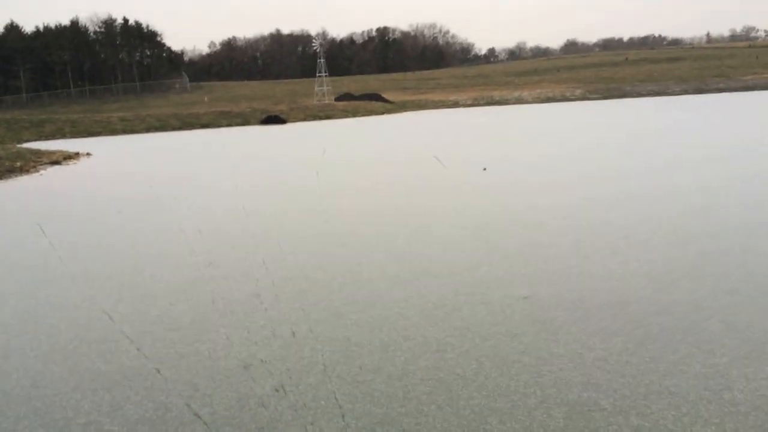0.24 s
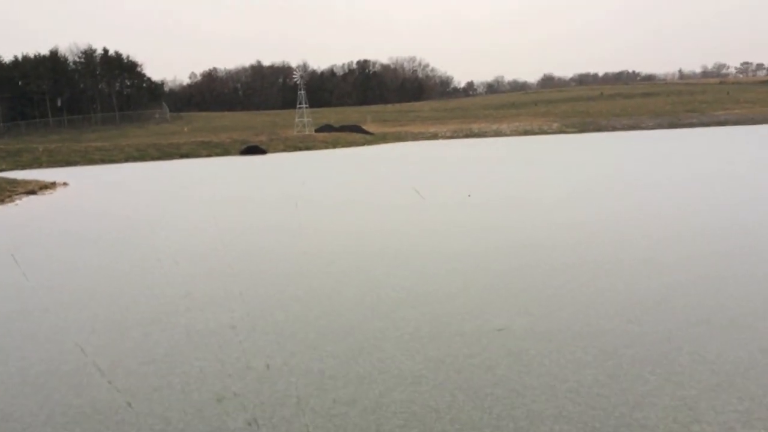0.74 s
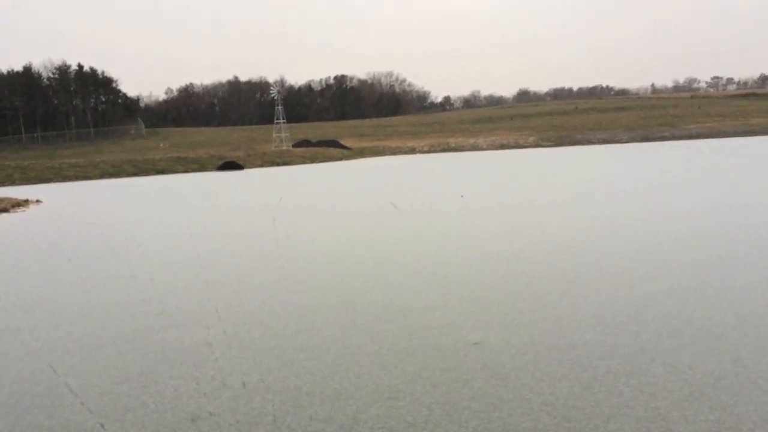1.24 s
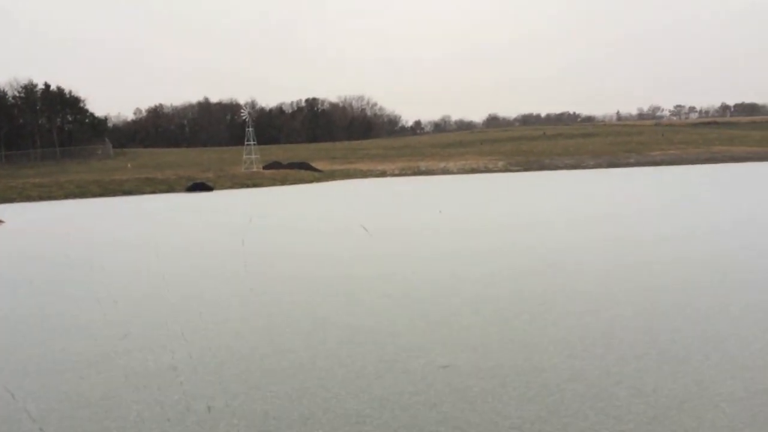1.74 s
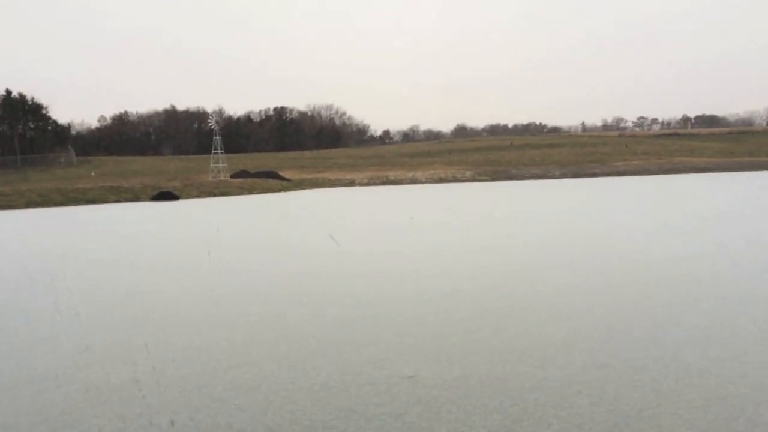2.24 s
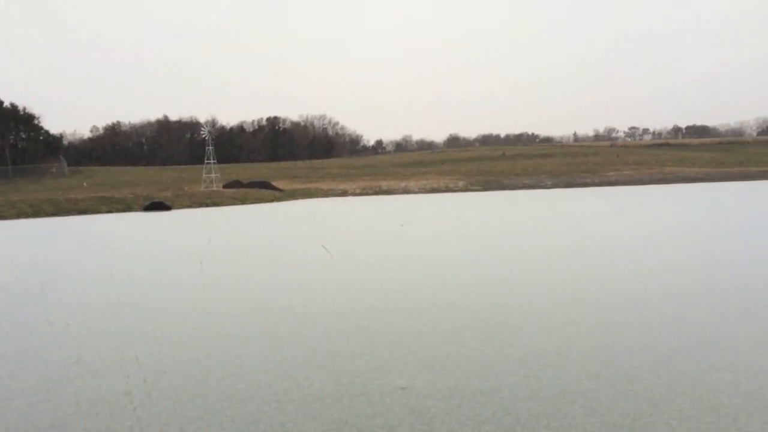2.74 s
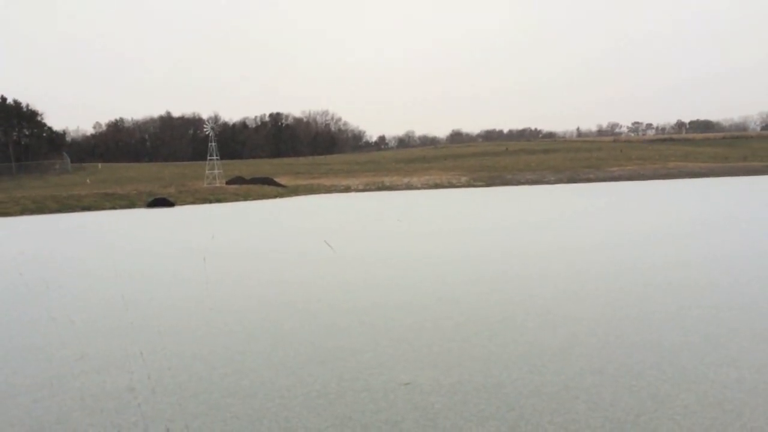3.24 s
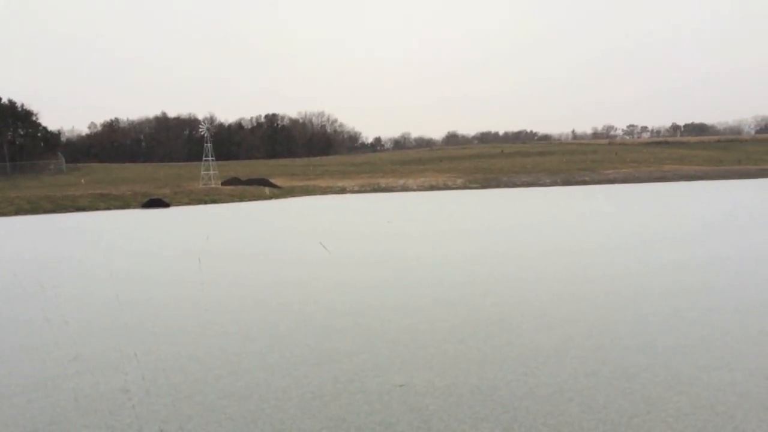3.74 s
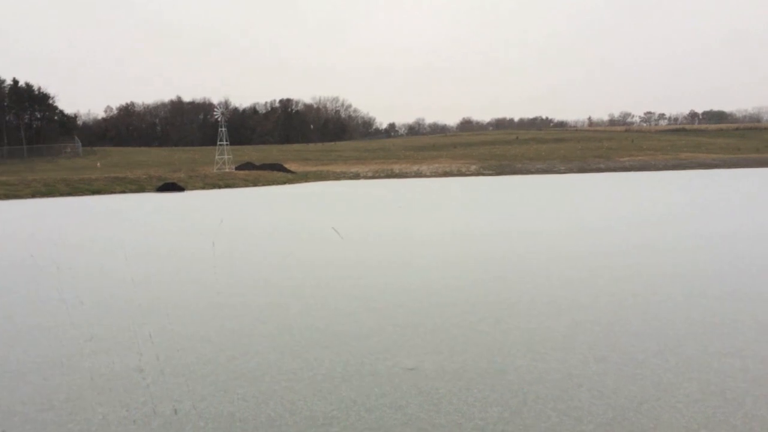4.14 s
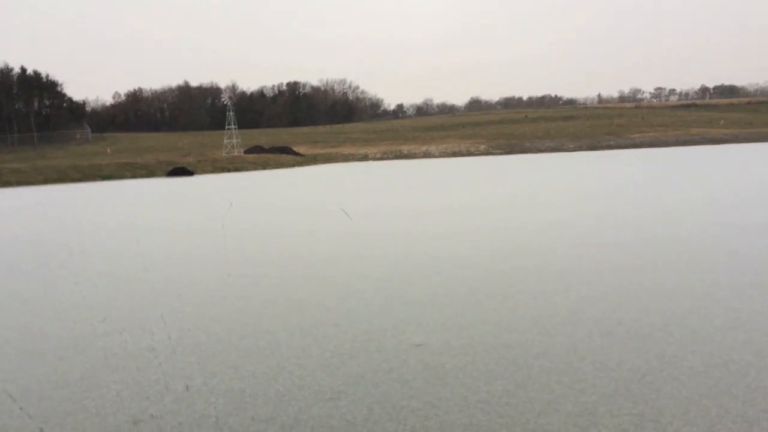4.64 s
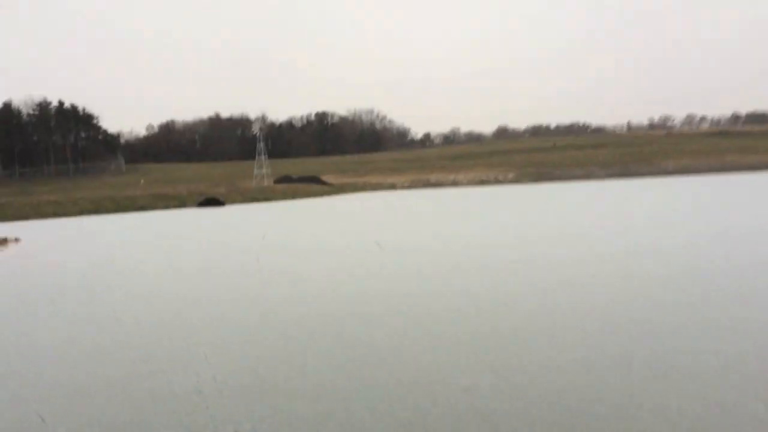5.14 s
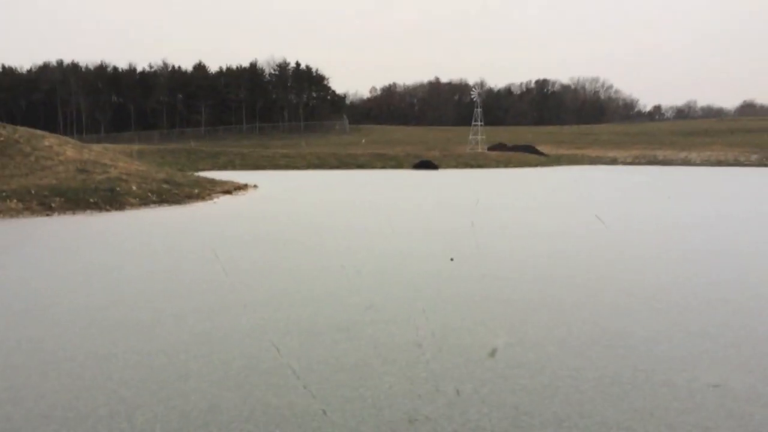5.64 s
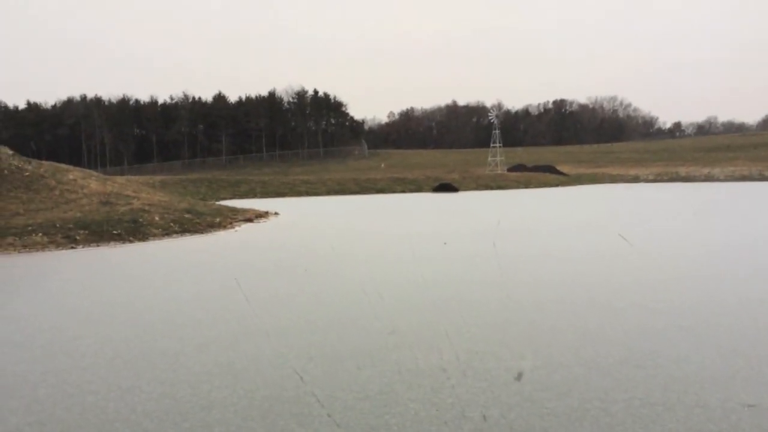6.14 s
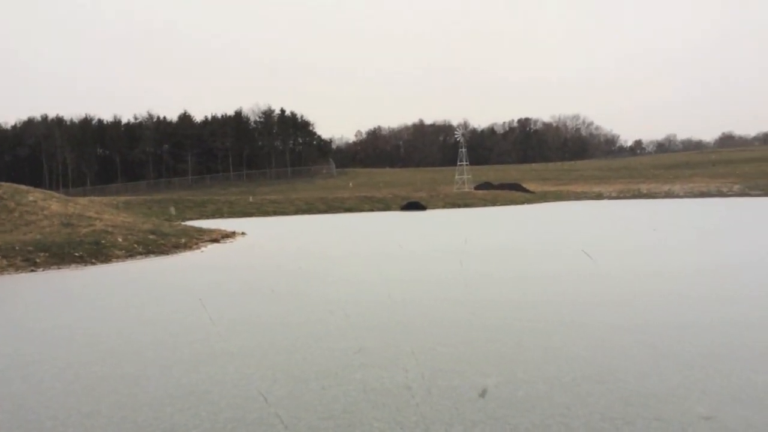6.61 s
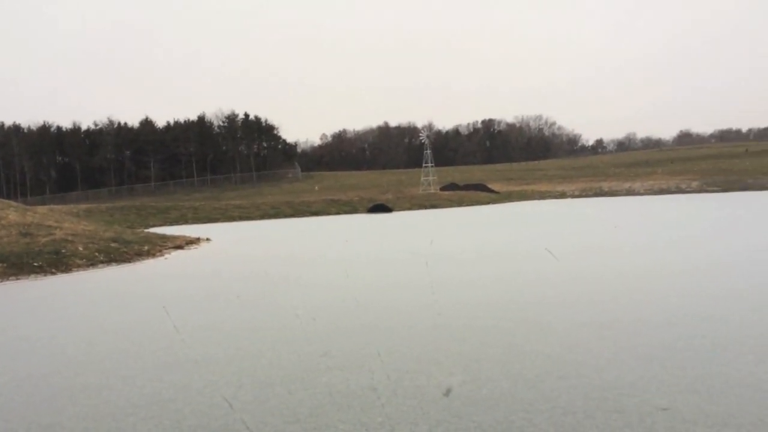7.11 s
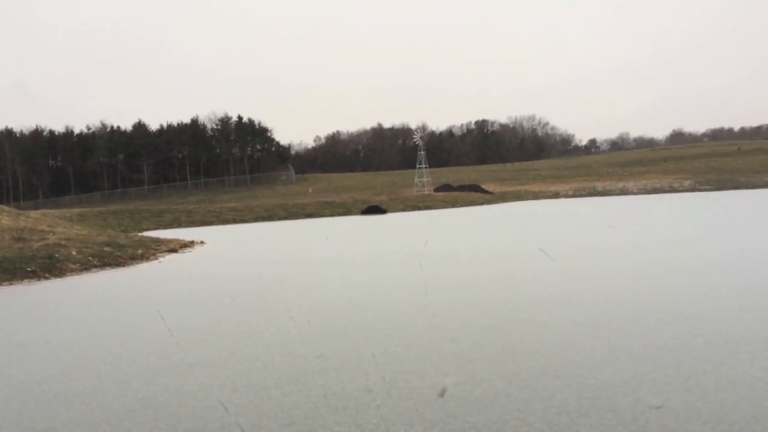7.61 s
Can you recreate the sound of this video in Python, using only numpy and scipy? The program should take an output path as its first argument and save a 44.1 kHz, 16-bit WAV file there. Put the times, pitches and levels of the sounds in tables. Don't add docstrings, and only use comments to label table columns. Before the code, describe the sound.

Two throws onto a frozen pond: bright laser-like chirps drop to a held ringing tone, fading with distance over faint breeze and echoing banks.

```python
import sys
import numpy as np
from scipy import signal
from scipy.fft import rfft, irfft, next_fast_len
from scipy.io import wavfile
from scipy.ndimage import uniform_filter1d, map_coordinates

SR = 44100
rng = np.random.default_rng(int(sys.argv[2]) if len(sys.argv) > 2 else 0)


def transcribe(signal):
    frames = np.atleast_2d(signal).T
    limited = np.clip(frames, -1, 1)
    pcm = np.round(limited * 32767).astype(np.int16)
    wavfile.write(sys.argv[1], SR, pcm)


def boost_factor(decibels):
    exponent = np.asarray(decibels, float) / 20
    return 10 ** exponent


N = 347067
SOUND_SPEED = 343
TOP_HZ = 15450
LEAD = SR // 4


def stones():
    # click arrival [s], chirp level [dB],
    # held tone re chirp [dB], chirp top re chirp [dB], click re chirp [dB]
    earlier = [
        (.02, -44.5, 4.4, 13.6, -6),
    ]
    # [s, dB, dB, dB, dB]
    first = [(0.5934, -26.5, 0, -25, -5), (0.8199, -17.5, -2, -9, -17), (1.1522, -29, -4, -15.5, -16.5),
             (1.342, -36, -3, -21, -11), (1.3592, -37.5, -7, -19.5, -5), (1.7125, -30, -4, -24.5, -17.5),
             (2.0007, -38.5, 1, -20, -20), (2.0089, -35, 2, -16, -28), (2.016, -27, -3.5, -18, -15),
             (2.3751, -30, -1.5, -26, -30), (2.3824, -34, -4, -20, -8), (2.581, -47, -14, -32, -10),
             (2.5921, -46, -13.5, -25.5, -12), (2.7923, -27, -4.5, -22, -30),
             (2.858, -38, -3.5, -25.5, -19), (3.0017, -44, -2.5, -18.5, -18), (3.0893, -58.5, 5.5, -12, 0),
             (3.1401, -53, -2.5, -26, -8), (3.1516, -63, 2, -10, -3), (3.2138, -73.5, -3, -18, 1),
             (3.307, -37.5, -4, -17, -12), (3.3488, -51, -0.5, -9, 6.5), (3.3959, -43, -1.5, -6, -2),
             (3.4055, -44, -1.5, -11, -7)]
    # [s, dB, dB, dB, dB]
    second = [(5.572, -21, -4.5, -1, 8.5), (5.5738, -16, -3, 1.5, 4.5), (6.0677, -25, -3.5, -6, -8),
              (6.3576, -38.5, 0.5, -17, -2.5), (6.3635, -59, 6, 0, 14), (6.5, -47.5, -10.5, -14.5, 0.5),
              (6.5055, -64, -3, 2, 9.5), (6.605, -53.5, -1, -17, -11), (6.6144, -56, -5, -8.5, -10.5),
              (6.6987, -66, 8.5, -2, 7.5), (6.7065, -68, 1.5, -6, 0.5), (6.8138, -61.5, -6.5, -3.5, 15),
              (7.1192, -39, -2.5, -9.5, 5), (7.3014, -46, 1, -20, 2), (7.4385, -60, 4, -17, 3),
              (7.4511, -60, 1.5, -12, -9), (7.5596, -49, 3, -18, -14), (7.6803, -67.5, -10, -6, -2),
              (7.688, -68, -10, -5, -2), (7.7207, -62, 4.5, -22.5, -1.5), (7.7464, -54.5, 0, -20.5, -10),
              (7.8676, -57.5, -4.5, -16, -8)]
    # time [s], distance [m]
    path = [(0, 2.43), (.59, 10.2), (.82, 12), (1.15, 15.64), (1.71, 18.9), (2.02, 19.8), (2.38, 21.3),
            (2.8, 23.2), (3.41, 24.2), (5.57, 3.32), (6.07, 11), (6.36, 14.8), (6.6, 16.7), (6.81, 21.5),
            (7.12, 22.1), (7.44, 26), (7.87, 25)]
    # time [s], share of pitch [1/m]
    thinning = [(3.4, 0.0047), (5.5, .001)]
    # distance [m], haze [dB], ring [dB], far answer [dB], mirrored chirp [dB]
    bank_gain = [(2.5, -29, -3.5, 11, -17.5), (3.5, -22, -10, -24, -17.5), (10, -18.5, -19.5, -38.5, -26.5),
                 (26, -18.5, -24, -37.5, -30.5)]
    detour_m, detour_s = 14, .052
    mirror_fade_s = 0.017

    out = np.zeros(N + LEAD + SR)
    reach, *gains, mirror_db = np.transpose(bank_gain)
    for k, (s, db, held_db, top_db, click_db) in enumerate([*earlier, *first, *second]):
        metres = np.interp(s, *np.transpose(path))
        upturn = np.interp(s, *np.transpose(thinning))
        hit, before = bounce(metres, db, held_db, top_db, click_db, upturn=upturn)
        echo = signal.fftconvolve(hit, banks([np.interp(metres, reach, wet_db) for wet_db in gains]))
        start = LEAD + round(s * SR) - before
        if k >= len(earlier):
            out[start:][:len(hit)] += hit
        out[start:][:len(echo)] += echo

        mirrored_db = db + np.interp(metres, reach, mirror_db)
        mirror, before = bounce(metres + detour_m, mirrored_db, -0.91, top_db=-45, click_db=-40.5, deep_db=-40.5)
        fade = np.clip((before - np.arange(len(mirror))) / (mirror_fade_s * SR), 0, 1)
        part = out[LEAD + round((s + detour_s) * SR) - before:][:len(mirror)]
        part += (mirror * fade)[:len(part)]
    return out[LEAD:][:N]


def bounce(metres, db, held_db, top_db, click_db, match_hz=1140, deep_db=-17, upturn=0):
    # frequency [Hz], level [dB]
    crack = [(200, -30.5), (1200, -9.5), (4000, -2), (6000, -3), (9000, -10.5), (13000, -8), (15500, -29.5)]
    travel = metres / SOUND_SPEED
    u = np.arange(round(.16 * travel * SR), round(travel * SR)) / (travel * SR)
    bend_hz = np.minimum(match_hz * (.38 / np.maximum(u - .12, .01)) ** 1.55, TOP_HZ)

    def uneven(count):
        return np.interp(np.log(bend_hz), np.linspace(6, 10, count), rng.standard_normal(count))

    def turn(hz):
        return np.sin(2 * np.pi * np.cumsum(hz[::-1])[::-1] / SR)

    knee = max(1.6 + 0.084 * metres, 1.8)
    settled_hz = (bend_hz ** knee + match_hz ** knee) ** (1 / knee)
    leak_hz = settled_hz * (1 + upturn * metres * u ** 7 + 0.02 * uneven(count=30))
    level = along([(450, held_db), (800, held_db), (1100, -1), (1500, 2.5), (2100, 0.49 * top_db), (3500, top_db),
                   (6500, 2.0 * top_db - 9.5), (9000, 1.1 * top_db - 25), (13000, 2.9 * top_db - 24.5),
                   (TOP_HZ, -90)], bend_hz)
    knots = along([(1400, 1.9), (2500, 5.57)], bend_hz) * uneven(count=34)
    stop = np.sin(np.clip((1 - u) * travel / 0.00062, 0, 1) * np.pi / 2)
    leak = boost_factor(level + knots) * stop * turn(leak_hz)

    deep_curve = np.interp(u, [.4, .55, .75, .9, 1], [-17.5, 5, -7.5, -19.5, -28])
    deep = boost_factor(deep_db + deep_curve) * turn(bend_hz)
    click = boost_factor(click_db) * np.convolve(pulse(crack), [-1, rng.normal(0, .3), rng.normal(0, 0.067)])
    graze = np.diff(uniform_filter1d(rng.standard_normal(801), size=7))
    scuff = graze * boost_factor(np.linspace(-52, -24, num=800))
    return boost_factor(db) * np.concatenate([scuff, leak + deep, click]), len(scuff) + len(u)


def banks(wet_db):
    # delay [s], level [dB], rise [s per 20 dB], fall [s per 20 dB]
    haze_echoes = [
        (.004, -3, .02, .06),
        (.047, -2.5, 0.051, .1),
    ]
    # [s, dB, s per 20 dB, s per 20 dB]
    ring_echoes = [
        (.005, -5.5, .02, .12),
        (.046, -1, 0.032, .05),
        (.16, -14.5, .4, .06),
        (.2, -24, .1, .4),
    ]
    # [s, dB, s per 20 dB, s per 20 dB]
    far_echoes = [
        (.17, -8.5, .06, .3),
        (.245, 0.5, 0.078, 0.083),
    ]
    # frequency [Hz], level [dB]
    haze_colour = [(300, -6), (900, 2.5), (1300, -9.5), (2200, 7), (4000, -4), (6500, -6), (9000, -17),
                   (15000, -25)]
    # frequency [Hz], 60 dB decay time [s]
    haze_t60 = [(500, 2), (2000, 0.17), (5000, 0.82), (10000, 1.1)]

    def haze_db(hz, t):
        return along(haze_colour, hz) - 60 * t / along(haze_t60, hz)

    def ring_db(hz, t):
        width_hz, skirt_hz, skirt_s = 75, 220, 0.11
        return band(hz, 1195, np.where(hz < 1195, width_hz, width_hz + skirt_hz * np.exp(-t / skirt_s))) + 0 * t

    def far_db(hz, t):
        return band(hz, 700, 55) + 0 * t

    haze = tail(haze_echoes, haze_db, patchy_db=1.5, size=256)
    ring = tail(ring_echoes, ring_db, patchy_db=3, size=512)
    far = tail(far_echoes, far_db, patchy_db=1.5, size=1024)
    shares = [np.sqrt(width_hz / SR) for width_hz in (SR, 700, 700)]
    return sum(boost_factor(db) * share * echo for db, share, echo in zip(wet_db, shares, (haze, ring, far)))


def tail(shape, colour_db, patchy_db, size):
    hz, t, z = signal.stft(rng.standard_normal(SR // 2), SR, nperseg=size)
    patches = uniform_filter1d(rng.standard_normal(z.shape), size=4, axis=0)
    patches = uniform_filter1d(patches, size=5, axis=1)
    shaded = z * boost_factor(colour_db(hz[:, None], t) + patchy_db * unit(patches))
    wash = signal.istft(shaded, SR, nperseg=size)[1][:SR // 2]
    wash = wash * swells(shape, np.arange(len(wash)) / SR)
    return wash / np.linalg.norm(wash)


def sheet():
    # peak time [s], level [dB], rise [s per 20 dB], fall [s per 20 dB]
    sag_swell = [
        (.13, -69.5, 0.067, .3),
        (.22, -64.5, 0.23, .2),
    ]
    sag_hz, sag_hz_per_s = 278, 215
    t = np.arange(N) / SR
    thud = boost_factor(-14.5 - 60 * t / 0.091) * np.sin(2 * np.pi * (92 * t - 120 * t * t) + 2.2)
    thud = thud * np.clip(t / 0.0087, 0, 1) * (t < .2)
    sag = np.sin(2 * np.pi * (sag_hz * t - sag_hz_per_s * t * t / 2))
    return thud + swells(sag_swell, t) * boost_factor(wobble(30)) * sag


def sleeve():
    # peak time [s], swish [dB], rise [s per 20 dB], fall [s per 20 dB], body re swish [dB]
    strokes = [
        (.02, -68.5, 0.36, 0.072, 10),
        (4.83, -65, 0.29, 0.15, 4.9),
        (5.171, -62, 0.18, 0.13, 4.2),
        (5.248, -52, 0.056, 0.2, 3.3),
        (5.286, -64.5, 0.036, 0.017, 25.7),
        (5.343, -66.5, 0.015, 0.055, 19),
        (5.4, -103, 0.19, 0.44, 2.3),
    ]
    # time [s], peak level [dB]
    snaps = [(0.0014, -57), (0.0409, -37.5), (0.0468, -55), (0.0767, -36.5), (0.0888, -50), (0.3501, -50.5),
             (0.3665, -49.5), (2.919, -59), (3.9642, -66.5), (5.034, -52), (5.0952, -43.5), (5.1197, -42.5),
             (5.1392, -26.5), (5.1743, -30), (5.1973, -55), (5.2346, -32), (5.2703, -50), (5.2995, -58),
             (5.366, -31), (5.4008, -33), (5.4115, -34.5), (5.771, -53.5), (7.1403, -65.5), (7.1566, -58.5)]
    # frequency [Hz], level [dB]
    snap_colour = [(500, -12), (2000, -14), (4000, 1), (8000, 0.5), (12000, -10.5), (15500, -6)]
    # frequency [Hz], density [dB per Hz]
    swish_colour = [(880, -23), (1500, -9.5), (2090, -5), (2720, -15), (3340, -9.5), (4750, -16.5),
                    (6690, -16), (15500, -33)]
    # frequency [Hz], density [dB per Hz]
    body_colour = [(88, -31.5), (150, -5.5), (356, -7), (559, -15.5), (658, -13.5), (1030, -13),
                   (3000, -26.5), (3900, -64), (6600, -120)]

    clock = np.arange(N) / SR
    swish = swells([row[:4] for row in strokes], clock)
    body = swells([(s, db + body_db, rise, fall) for s, db, rise, fall, body_db in strokes], clock)
    grain = boost_factor(3.6 * wobble(46) + 1.8 * wobble(500))
    rub = swish * unit(grain * noise(swish_colour))
    rub = rub + body * unit(boost_factor(2 * wobble(40)) * noise(body_colour))
    t = np.arange(200) / SR
    for s, db in snaps:
        burst = np.convolve(boost_factor(-60 * t / .0025) * rng.standard_normal(len(t)), pulse(snap_colour))
        rub[round((s + .001) * SR):][:len(burst)] += boost_factor(db) * burst / abs(burst).max()
    return rub


def knocks():
    # time [s], peak level [dB], pitch [Hz], half length [s]
    bumps = [
        (0.137, -53, 74.6, 0.0098),
        (5.331, -30.5, 63.3, 0.015),
        (5.541, -39.5, 77, 0.0089),
        (5.783, -48, 87.7, 0.01),
        (5.832, -37.5, 135, 0.0033),
        (5.854, -35.5, 108.5, 0.0039),
        (5.92, -45, 80.8, 0.0091),
    ]
    t = np.arange(N) / SR
    return sum(boost_factor(db) * np.exp(-((t - s) / half) ** 2) * np.cos(2 * np.pi * hz * (t - s) + 0.25)
               for s, db, hz, half in bumps)


def air():
    # time [s], peak [dB], rise [s per 20 dB], fall [s per 20 dB]
    puffs = [
        (.015, -27.5, 0.29, 0.019),
        (.15, -59, 0.046, 0.033),
        (5.17, -48, 0.071, .08),
        (5.265, -37, 0.035, 0.039),
        (5.34, -36.5, 0.055, 0.025),
        (5.835, -48, 0.074, 0.024),
        (5.94, -77, 0.044, 0.052),
    ]
    # time [s], level [dB], half length [s]
    lulls = [
        (5.5, 0, 0.038),
        (5.68, -2.5, 0.13),
        (6.03, -8.5, 0.13),
        (6.452, -2, 0.4),
        (7.145, -2, 0.28),
    ]
    # frequency [Hz], density [dB per Hz]
    rumble = [(12, -55.5), (20, -28.5), (54, 1.5), (96, 1.5), (136, -0.5), (230, -17.5), (296, -22.5),
              (371, -23.5), (400, -26.5), (520, -49), (880, -120)]
    # frequency [Hz], density [dB per Hz]
    hiss = [(120, -27), (200, -6.5), (371, -10), (437, -10.5), (742, -13.5), (812, -14), (1430, -16),
            (1950, -20.5), (2750, -22.5), (3750, -24.5), (15500, -30)]
    breeze_db, gusty_db, hiss_db = -64.5, .7, -73.5
    t = np.arange(N) / SR
    shelter_db = sum(db * np.exp(-((t - s) / half) ** 2) for s, db, half in lulls)
    strength = boost_factor(breeze_db + gusty_db * wobble(5) + shelter_db) + swells(puffs, t)
    buffet = strength * unit(boost_factor(2.5 * wobble(18)) * noise(rumble))
    return buffet + boost_factor(hiss_db + .5 * wobble(1) + .5 * wobble(3.3)) * noise(hiss)


def unit(x):
    return x / np.sqrt(np.mean(x ** 2) + 1e-20)


def along(points, hz):
    f, v = np.transpose(points)
    return np.interp(np.log(hz + 1), np.log(f + 1), v)


def wobble(rate):
    return map_coordinates(rng.standard_normal(int(N * rate / SR) + 4), [np.arange(N) * rate / SR])


def noise(spectrum):
    m = next_fast_len(N + 8192)
    gain = boost_factor(along(spectrum, np.fft.rfftfreq(m, 1 / SR)))
    return unit(irfft(rfft(rng.standard_normal(m)) * gain, m)[:N])


def pulse(spectrum):
    cep = irfft(np.log(boost_factor(along(spectrum, np.fft.rfftfreq(512, 1 / SR))) + 1e-6))
    cep[1:256] *= 2
    cep[257:] = 0
    kick = irfft(np.exp(rfft(cep)))[:128]
    return kick / abs(kick).max()


def band(hz, centre_hz, width_hz):
    return -10 * np.log10(1 + ((hz - centre_hz) / width_hz) ** 4)


def swells(rows, t):
    return sum(boost_factor(db - 20 * np.maximum((s - t) / abs(rise), (t - s) / abs(fall))) for s, db, rise, fall in rows)


def scene():
    return (stones() + sheet() + sleeve() + knocks() + air())[None]


def low_pass(x):
    return signal.sosfilt(signal.butter(12, 15730, fs=SR, output="sos"), x)


def record(dry):
    narrow = irfft(rfft(dry) * (np.fft.rfftfreq(N, 1 / SR) < TOP_HZ), N)
    return low_pass(narrow)


dry = scene()
out = record(dry)
transcribe(out)
```